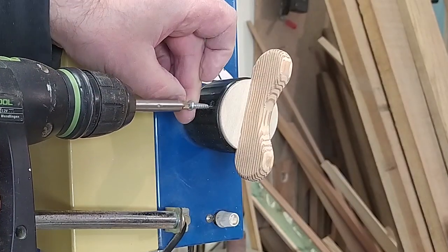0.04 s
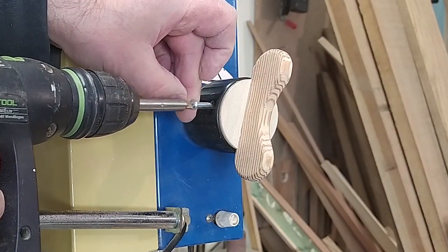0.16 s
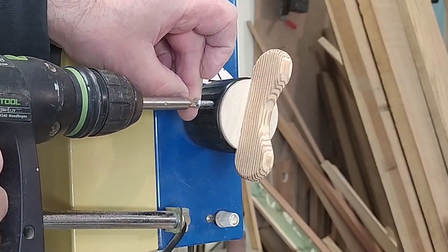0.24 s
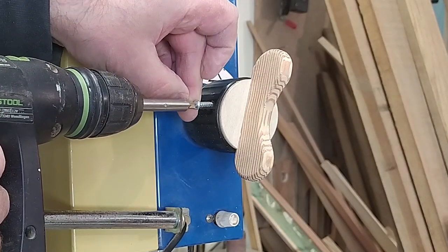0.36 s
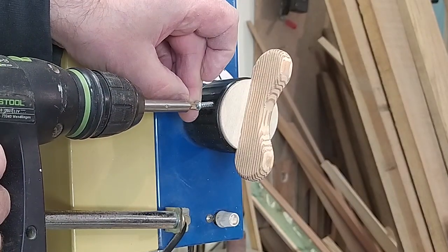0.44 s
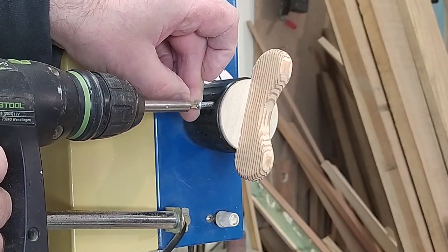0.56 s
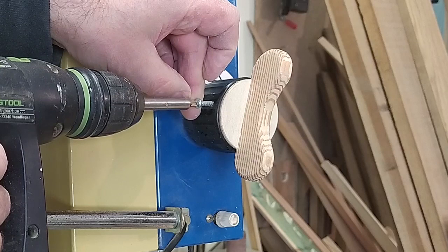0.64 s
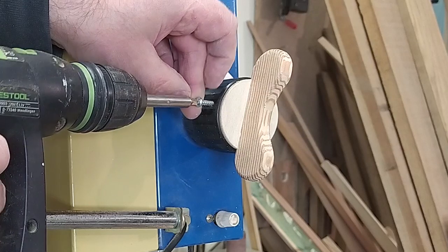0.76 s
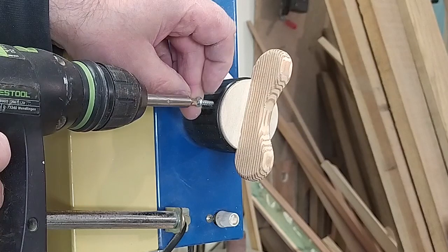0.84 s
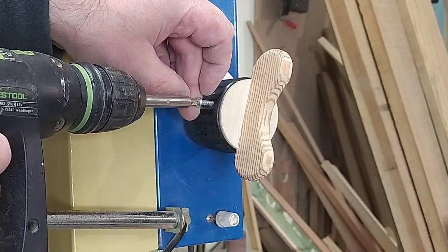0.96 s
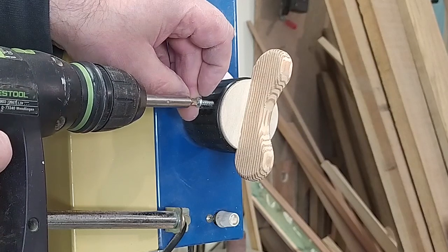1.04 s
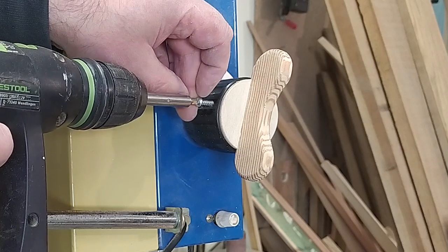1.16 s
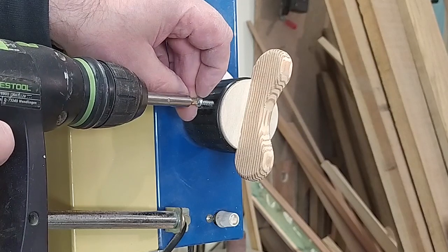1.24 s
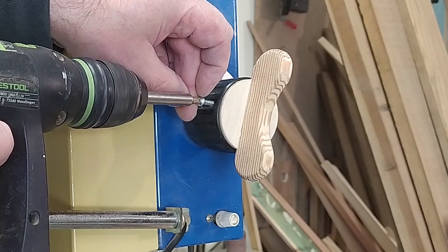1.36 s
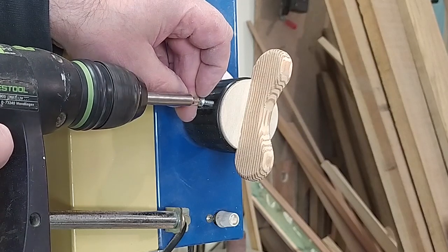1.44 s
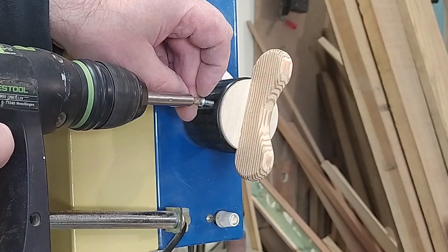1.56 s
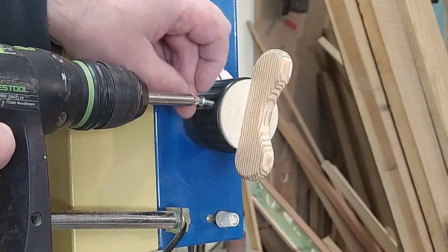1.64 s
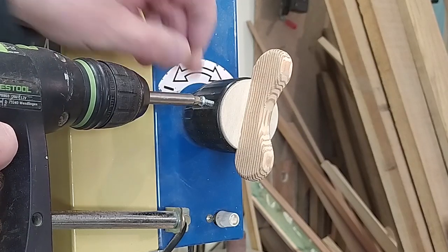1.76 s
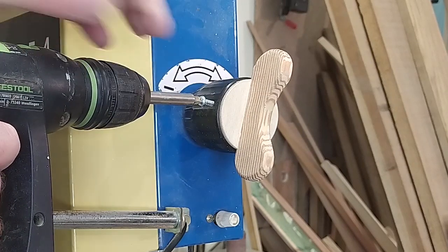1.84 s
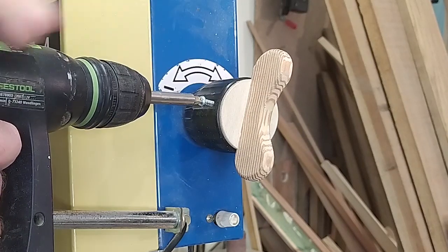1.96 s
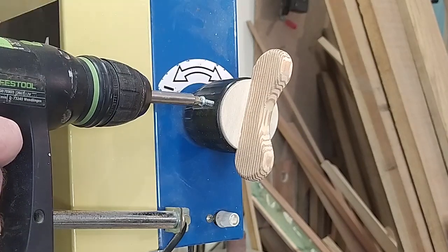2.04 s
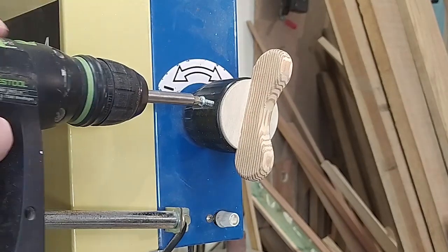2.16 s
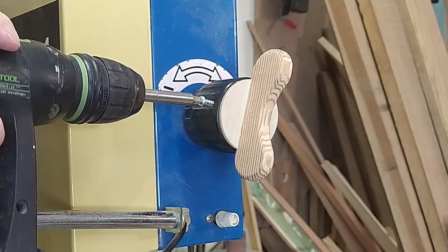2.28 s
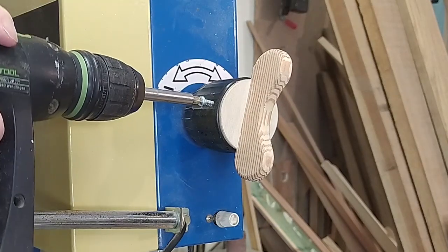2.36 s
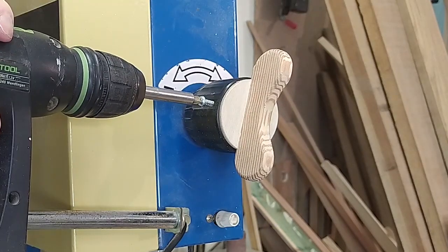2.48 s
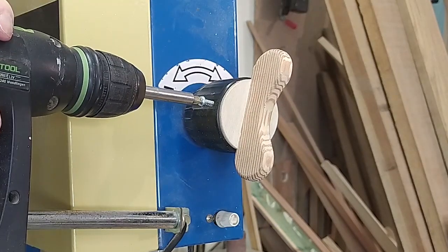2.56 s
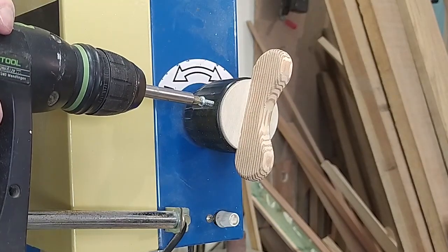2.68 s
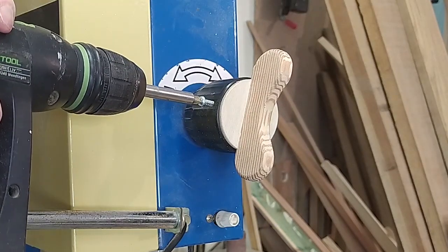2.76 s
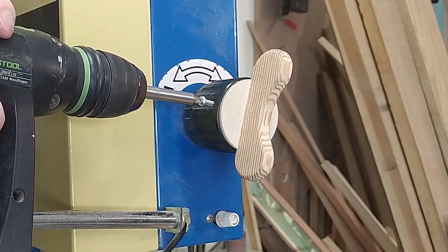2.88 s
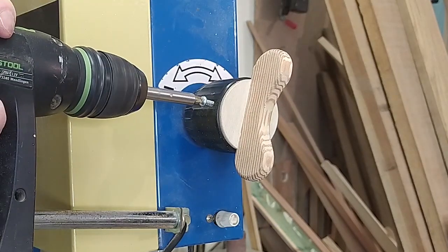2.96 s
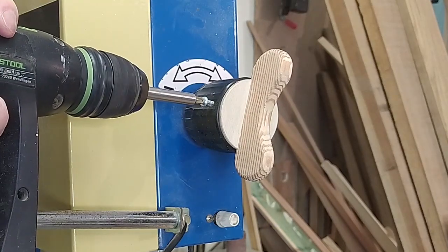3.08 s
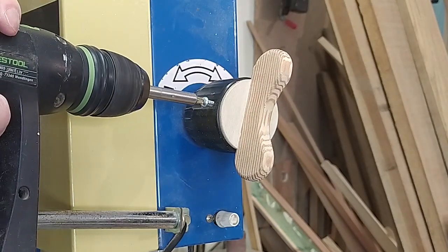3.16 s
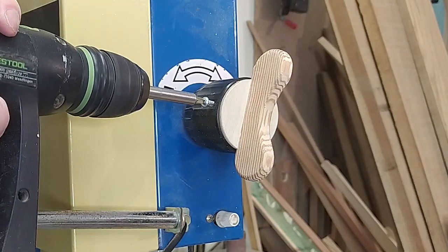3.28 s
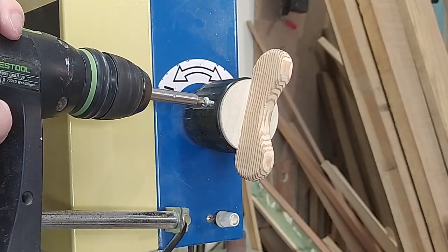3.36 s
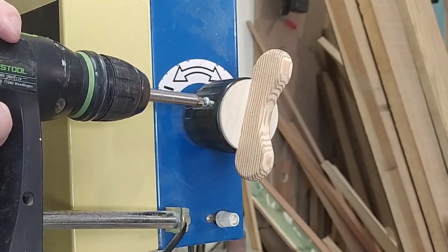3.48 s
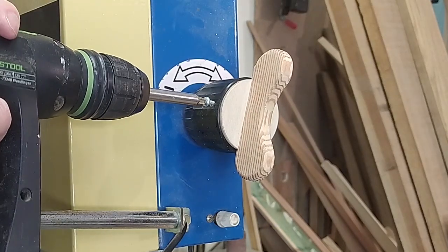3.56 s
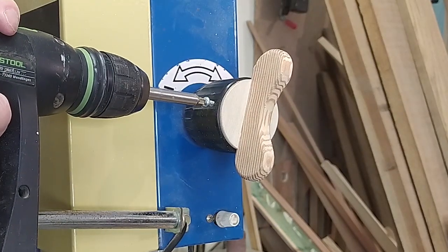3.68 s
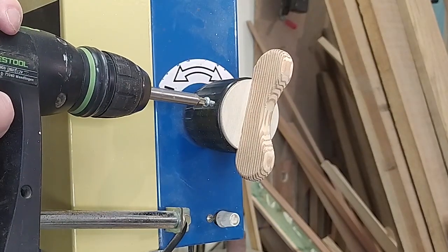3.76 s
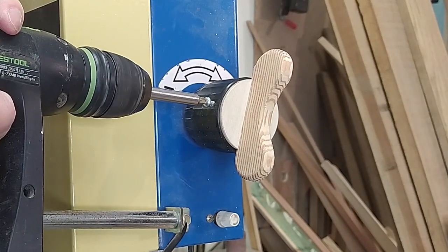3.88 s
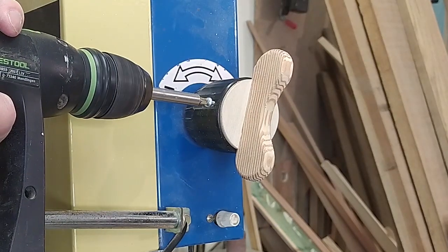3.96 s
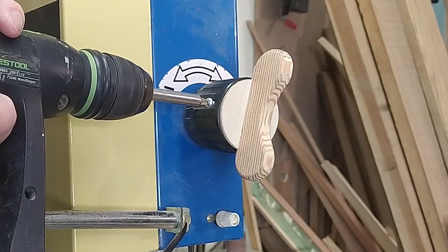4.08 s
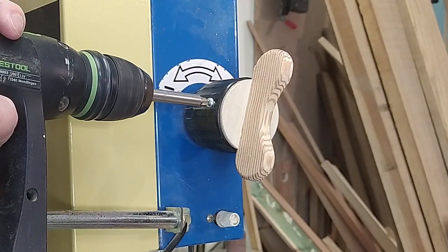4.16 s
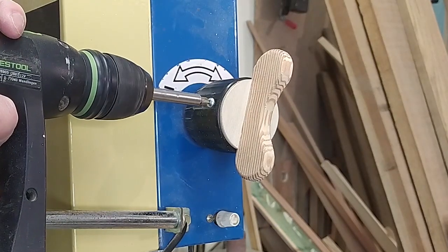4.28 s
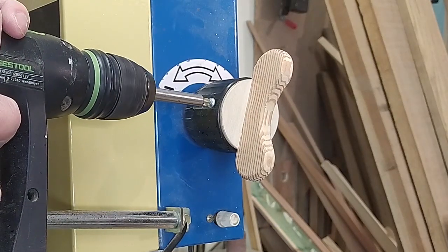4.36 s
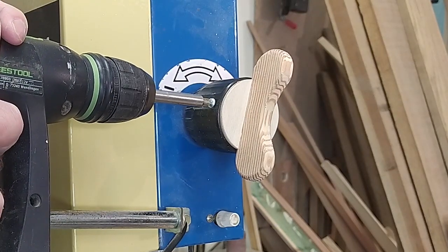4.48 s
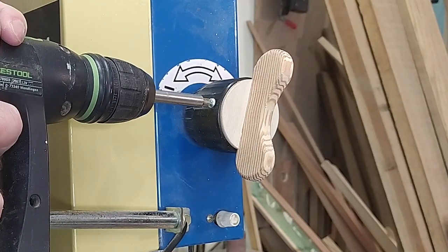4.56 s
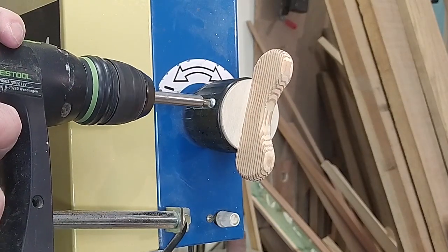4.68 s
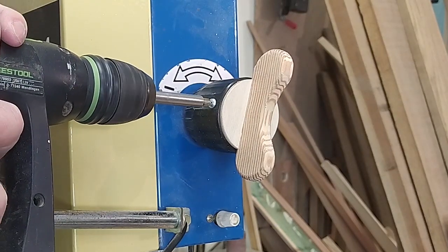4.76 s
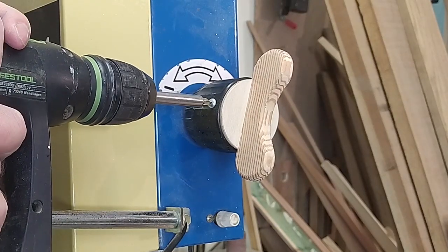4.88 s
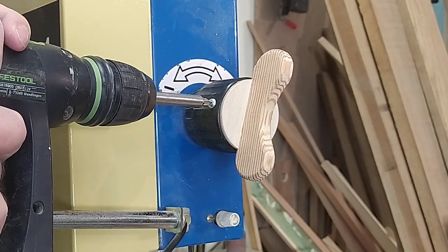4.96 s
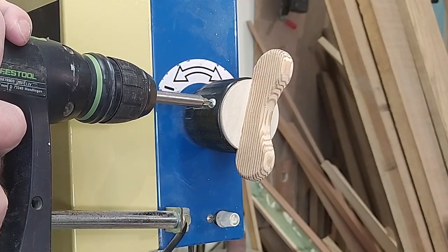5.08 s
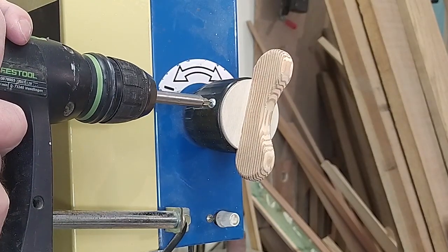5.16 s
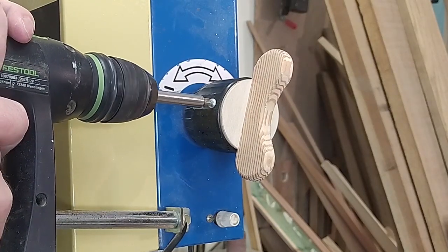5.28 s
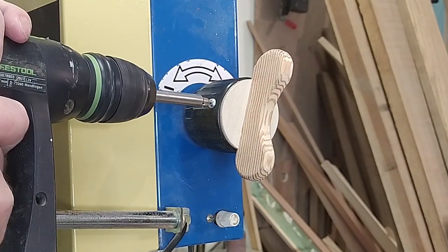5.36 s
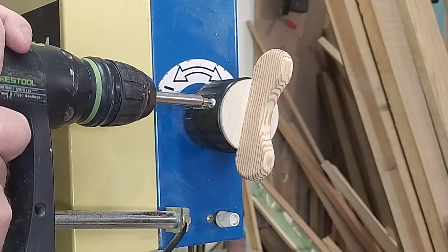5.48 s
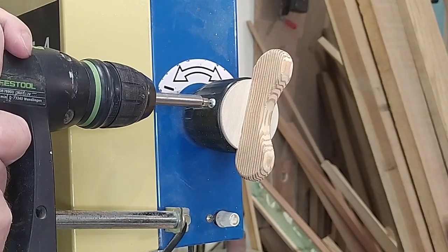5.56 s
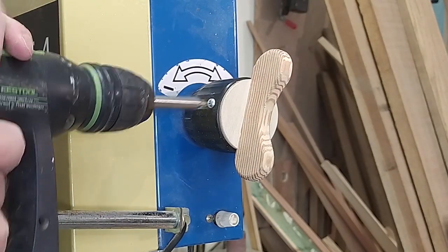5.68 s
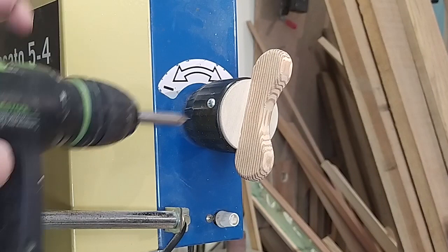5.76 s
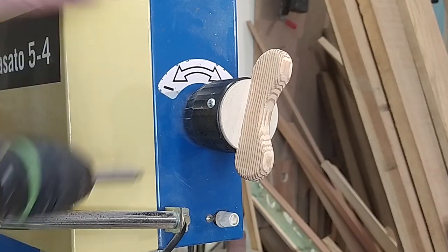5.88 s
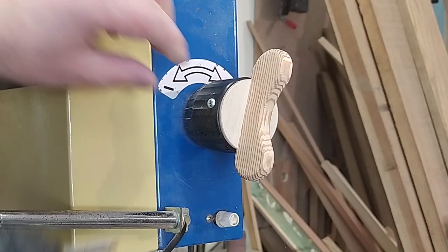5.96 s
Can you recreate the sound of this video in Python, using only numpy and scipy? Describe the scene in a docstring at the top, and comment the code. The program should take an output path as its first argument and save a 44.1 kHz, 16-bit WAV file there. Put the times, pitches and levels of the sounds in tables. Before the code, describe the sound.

Quiet workshop air and faint hiss, with barely audible bumps and a soft scrape near 0.75 s. Small ticks lead to a firmer click at 1.5 s as a cordless drill runs gently from 1.4 to 2.0 s, its whir rising briefly, then sagging with little sliding whines. Soft brushing follows around 2.2 to 2.6 s; clicks at 2.9 and 3.0. A stronger run from 3.05 to 3.65 climbs in pitch, gritty with gear rattle and a thin, very high whistle, a sharp crack and hollow bench thump at 3.55. The brightest run spans 4.0 to 4.65, whining, with heavy woody knocks near 4.6. A quick zip at 4.9 to 5.1, scattered clicks, then a last very short burst at 5.45 to 5.6 with a thump and loose chatter. The small room's tail fades; a faint hand rustle and tick come at 5.9. Close stereo pickup.

```python
"""A cordless drill drives small screws in five short runs on a hollow bench, close to a two-port phone.
Its gears rattle the housing as uneven noise; the motor switching whistles, with sidebands that follow speed.
Tones slide or hold, trigger and bit click as spikes with short rings, and strokes of noise brush and scrape.
Handling bumps, small thumps under clicks and jolts of the seating screw push and shake bench modes,
which boom and ring on; loose parts chatter. A small workshop adds decaying noise tails and quiet air."""
import sys
import numpy as np
from scipy import signal
from scipy.fft import rfft, irfft
from scipy.io import wavfile
from scipy.ndimage import uniform_filter1d

SR = 44100
rng = np.random.default_rng(int(sys.argv[2]) if len(sys.argv) > 2 else 0)


def materialize(psi):
    """Save the field psi as 16-bit PCM at rate SR to the path in sys.argv[1].

    A 1-D psi becomes a single channel; in a 2-D psi each row is a channel.
    """
    bounded = np.clip(np.atleast_2d(psi).T, -1, 1)
    quanta = np.round(bounded * 32767).astype(np.int16)
    wavfile.write(sys.argv[1], SR, quanta)


N = 265834

# quiet workshop air and hiss: f/Hz, relative level/dB
SHOP_AIR = [(12, -12), (20, 2), (59, -8.5), (83, -15.5), (166, -16.5), (232, -21), (267, -21.5),
            (298, -21.5), (885, -32), (1630, -41.5), (1880, -38), (3980, -46.5), (10600, -43.5),
            (15600, -83)]
# bumps, thumps and jolts on the bench: t/s, strength/dB, modes under 210 Hz rel level/dB,
# modes over 310 Hz rel level/dB, modes over 600 Hz rel level/dB, shaking rel level/dB, shaking decay/s
BLOWS = [(0.076, -75, -10, 14, -6, 1, 0.043), (0.282, -70, -9, 13, -29, 13, 0.29),
         (0.353, -62, 2, 17.5, -18, -9, 0.033), (0.381, -57.5, 8.5, 12, -29, -7.5, 0.12),
         (0.637, -58, -11, 4.5, -21, -0.5, 0.19), (.772, -69, 8, 10, -20, -2.5, 0.055),
         (0.914, -69, -12, -5, -16, 1.5, 0.03), (2.898, -70, 5, 4, 3, 3, 0.0089),
         (3.011, -67, 8, 1, 1, 3, 0.02), (5.333, -59, 1, 4, 2, 2, 0.01), (5.451, -66, 6, 7, -6, -2, 0.017),
         (3.542, -29, -3.5, 3, 5.5, -1.5, 0.049), (3.546, -40, 7, 5.5, 19, -17, 0.16),
         (3.612, -31.5, 2, 5, 1.5, -9, 0.016), (4.566, -26, -6.5, 7.5, 6.5, -2, 0.058),
         (4.601, -23, 0, -3.5, -9, -4, 0.02), (5.501, -56, -11, -11, -12, -11, 0.016),
         (5.51, -27, 7.5, 10, 8.5, -0.5, 0.04), (4.661, -44, -7, 18, -1.5, -0.5, 0.071),
         (4.703, -51.5, 1, 17.5, -1, -24, 0.079), (5.6, -38.5, 4, 3, 6.5, 1.5, 0.036),
         (5.551, -32, -7.5, 15.5, -12, -6, 0.11)]
# bench modes: f/Hz, level/dB, time to fall 60 dB/s
BENCH_MODES = [(197, -1, .11), (182, -15, 2.0), (270, 2, .11), (161, -27, 1.2), (303, 4, .08),
               (295, -24, 2.2), (400, -10, .08), (269, -27, 1.2), (335, -4, .09), (113, -37, 1.5),
               (212, -10, .1), (356, -20, .6), (388, -13, .22), (476, -22, .6), (416, -21, .4),
               (520, -21, .08), (262, -7, .16), (83, -25, .25), (60, -35, .3), (140, -26, .2),
               (186, -12, .4), (108, -26, .3), (571, -17, .3), (620, -16, .1), (680, -15, .15),
               (727, -10, .12), (787, -9, .1), (870, -16, .1), (970, -16, .1), (1110, -10, .12),
               (1250, -12, .08), (1460, -7, .07), (1780, -12, .05)]
# loose boards answer a blow without ringing: f/Hz, gain/dB
BOARD_CRUNCH = [(100, -9), (150, 13), (200, 9), (240, -15), (310, 29.5), (400, 35), (520, 22), (800, 38.5),
                (1500, 21), (3000, 24), (8000, -5)]
# loose parts chattering after a blow: f/Hz, gain/dB
LOOSE_PARTS = [(300, -17), (520, 30), (720, 33.5), (880, 27), (1100, 34.5), (1280, 19.5), (1460, 19.5),
               (1800, 20), (3500, 11), (8000, -28)]
# trigger and bit ticks: t/s, level/dB, low part rel level/dB, ring time to fall 60 dB/s, left minus right/dB
TICKS = [(0.1537, -72, -1, 0.04, -5), (0.187, -75, 4, 0.068, -2), (0.2856, -68, -31, 0.025, -7),
         (0.3483, -69, 10.5, 0.041, 6.5), (1.259, -61, -47, 0.025, -9.5), (1.316, -47, -5, 0.02, -3.5),
         (1.36, -63, -39, 0.015, -7), (1.3789, -55, -4, 0.014, -2), (1.408, -54, -23, 0.025, -3),
         (1.48, -33, -7.5, 0.016, -5), (2.305, -76, 10, 0.039, 1), (2.61, -69, 9.5, 0.024, -2),
         (2.8982, -35, -18, 0.0083, -5.5), (2.993, -84, 18, 0.085, 9), (3.013, -39, -10.5, 0.0086, -5),
         (3.5494, -20.5, -35, 0.011, -4), (3.8897, -61, -35, 0.037, -7), (3.9432, -35, -16, 0.0083, -5.5),
         (3.966, -60, -30, 0.058, 2), (4.558, -35, 0, 0.13, -11.5), (4.571, -32.5, 10.5, 0.015, 17),
         (4.8294, -27.5, -25, 0.0066, -3), (4.846, -40, -6, 0.0086, -2), (5.085, -40, 0.5, 0.019, 6),
         (5.2645, -40.5, -14, 0.0088, -4), (5.3313, -38.5, -18, 0.01, 4), (5.342, -52.5, -2.5, 0.026, -12),
         (5.447, -37, -14.5, 0.013, -6.5), (5.472, -51, -51, 0.046, -24), (5.5008, -30.5, -29, 0.051, 1),
         (5.514, -42, 1, 0.11, -19), (5.9185, -53, 4.5, 0.031, 1)]
# bright part of a tick: f/Hz, relative level/dB
TICK_COLOUR = [(900, -36), (1600, -26), (2500, -1.5), (4000, -10.5), (6000, -7), (7500, -1), (9000, 0.5),
               (10500, -12.5), (12500, -21), (15600, -59)]
# strokes of a sleeve or hand: loudest t/s, level/dB, swell/(dB per s), fade/(dB per s)
RUSTLES = [(2.21, -70.5, 507, 174), (2.275, -83, 631, 172), (2.428, -58, 162, 202), (2.575, -68, 193, 131),
           (5.913, -57.5, 258, 498), (6.0, -78, 199, 219)]
# brushing noise: f/Hz, relative level/dB
RUSTLE_COLOUR = [(590, -36), (1000, -32), (1600, -13), (1720, -25), (2210, -8.5), (3970, -13),
                 (5360, -14.5), (9090, -3.5), (15600, -30)]
# one scrape: loudest t/s, level/dB, swell/(dB per s), fade/(dB per s)
SCRAPE = (.75, -67, 350, 200)
# one row per pull of the trigger: pulled t/s, let go t/s, switching tone level/dB, other sidebands level/dB,
# fizz over rattle/dB, body drone start level at the reference rattle/dB, upper singing over rattle/dB,
# lower singing over rattle/dB, gear-case ring over rattle/dB
RUNS = [(1.398, 1.922, -55, -55.5, -2, -62.5, -22, -16, -27),
        (3.054, 3.648, -43, -58.5, -8, -56.5, -7.5, -52, -8),
        (4.008, 4.637, -45.5, -75, -6, -52, -24, -37, -8),
        (4.862, 5.056, -44, -74, -6.5, -49, -8.5, -19, -6),
        (5.454, 5.598, -41.5, -55, -4.5, -46.5, -20, -23, -4.5)]
# motor, one curve per run: t/s, commutation f/Hz, rattle level/dB, first upper sideband level/dB
MOTOR = [
    [(1.39, 200, -67.5, -81), (1.46, 431, -52, -70), (1.54, 479, -53, -65), (1.58, 656, -48.5, -48),
     (1.65, 669, -50, -48), (1.69, 465, -54.5, -72), (1.80, 451, -50.5, -68), (1.90, 452, -53, -71),
     (2.03, 330, -83, -85)],
    [(3.03, 156.3, -69.5, -64), (3.10, 695, -47, -67), (3.20, 786, -44.5, -73), (3.37, 880, -43, -51),
     (3.53, 907, -44.5, -53), (3.645, 880, -45, -70), (3.69, 770, -93, -80)],
    [(4.01, 149.7, -57.5, -67), (4.065, 900, -42, -55), (4.14, 1023, -41.5, -39), (4.24, 1028, -42, -39),
     (4.30, 1000, -41.5, -52), (4.40, 1001, -43.5, -51), (4.50, 1016, -41.5, -47), (4.57, 990, -43, -40),
     (4.68, 890, -49, -75)],
    [(4.87, 153, -59, -66), (4.915, 700, -46, -61), (4.96, 876, -41.5, -54), (5.03, 915, -47, -45),
     (5.08, 858, -54.5, -50), (5.12, 804, -87, -78)],
    [(5.455, 149, -51, -76), (5.515, 880, -44, -60), (5.595, 880, -44.5, -58), (5.63, 800, -50, -75)],
]
# gear rattle: f/Hz, relative level/dB
RATTLE_COLOUR = [(600, -14), (900, -19), (1300, -4.5), (1500, 3), (1850, -3.5), (2250, 5.5), (2650, -5),
                 (3400, -3.5), (4000, -3), (4700, -3.5), (5800, -8), (7500, -14), (9700, -54),
                 (16000, -110)]
# motor fizz: f/Hz, relative level/dB
FIZZ_COLOUR = [(3820, -69), (6500, -11.5), (7610, -5), (7690, -6), (9140, 1), (10700, -18), (13800, -23.5),
               (14600, -27), (15600, -89)]
# drone of the drill body: f/Hz, relative level/dB
BODY_COLOUR = [(59, -58), (100, -11.5), (166, 1), (226, -23), (260, -7.5), (344, -7.5), (698, 1),
               (1300, -4.5), (1690, 0.5), (2860, -120)]
# share of the tool's noise that differs between the ports: f/Hz, level/dB
TOOL_SPREAD = [(300, -23), (1000, -26.5), (2000, -12), (3200, -2.5), (6000, -3.5), (9000, 0)]
# other whistle sidebands: multiple of the commutation rate, relative level/dB
SIDEBANDS = [(-1, 0), (2, -1), (-2, -16), (3, -10), (4, -5)]
# gear whines and one low steady drill hum:
# start t/s, length/s, first f/Hz, final f/Hz, level/dB, pitch jitter/Hz
WHINES_AND_HUM = [(1.53, .15, 1850, 2050, -54.5, 20), (1.57, .09, 1050, 1070, -55.5, 15),
                  (1.77, .13, 2280, 2240, -53.5, 20), (1.74, .15, 1580, 1510, -55.5, 18),
                  (1.87, .10, 1400, 1030, -55.5, 30), (1.81, .11, 715, 705, -61, 12),
                  (3.20, .28, 4640, 4460, -50.5, 40), (3.07, .17, 2130, 2210, -54, 25),
                  (3.33, .16, 2300, 2240, -53, 35), (3.33, .12, 3120, 2960, -56, 25),
                  (1.49, .09, 2170, 2260, -58, 25), (3.57, .09, 2400, 2280, -51, 30),
                  (4.06, .49, 5150, 4680, -48, 20), (1.70, .46, 160, 160, -64, 4),
                  (4.94, .12, 4330, 4250, -64, 30)]
# how each source reaches the two ports: f/Hz, left minus right/dB
DRILL_PORTS = [(60, 9), (200, 5), (700, 3), (1300, 1), (2400, 1.5), (4400, -0.5), (8100, -6), (15000, -8)]
FAR_END_PORTS = [(60, -11), (15000, -3.5)]
BENCH_PORTS = [(60, 4.5), (200, 5.5), (700, 4.5), (1300, 2), (4400, 4), (8100, 11)]
WHISTLE_PORTS = [(60, -11), (15000, -11)]
# room tail: f/Hz, time to fall 60 dB/s
ROOM_T60 = [(60, 0.44), (300, 0.8), (1000, 0.54), (4000, 0.51), (10000, 0.39)]

SHOP_DB = -64.5
FRAME_DB, FRAME_LAG_S = 9.5, 0.034  # how well and how late a blow reaches the heavy frame
LONG_RING_S, LONG_SHAKE_DB = 0.2, -9
LOOSE_DB, LOOSE_S = -4.5, 0.095  # chatter level against the shaking, decay time
SPIKE_DB, RING_DB, TICK_RISE_S = 4, 3.5, 0.00051  # levels against the tick's level
GATE_S = 0.041  # each run fades in and out over this time
SWITCH_HZ, SWITCH_HISS_DB = 7967.5, -16.5  # the power stage also hisses; hiss level against the tone
SWITCH_RISE_S, SWITCH_FALL_S = 0.049, 0.0095
# the drone moves by this share of the rattle's dB and grows as the screw bites
BODY_FOLLOWS, BODY_REF_DB, BITE_DB_PER_S = 0.16, -56, 12
SINGING_SWAY_DB, GEAR_WANDER_DB = 9, 2.0
FIRST_RUN_TREBLE_DB = -0.5  # the unloaded first run is duller above 2.5 kHz
SLIDE_SETTLES, SLIDE_FADE_S = .32, .035  # settling as a share of the length; shortest fade
TOP_HZ = 15760
F = np.maximum(np.arange(N // 2 + 1) * SR / N, 1)  # every frequency, Hz
T = np.arange(N) / SR  # every moment, s


def undb(db):
    """Turn decibels into a gain."""
    return 10 ** (np.asarray(db) / 20)


def on_hz(table):
    """Read a (Hz, value) table at every frequency."""
    hz, value = np.transpose(table)
    return np.interp(np.log(F), np.log(hz), value)


def bump(centre_hz, half_width_hz, power=2):
    """One resonance: a gain that peaks at its centre."""
    return 1 / (1 + ((F - centre_hz) / half_width_hz) ** power)


def filtered(x, gain):
    """Apply a gain per frequency."""
    return irfft(rfft(x) * gain, N)


def colour(x, gain):
    """Filter by a gain per frequency, then set the rms to 1."""
    y = filtered(x, gain)
    return y / np.sqrt(np.mean(y ** 2))


def grit(spread_db):
    """Dense tiny impacts of uneven size."""
    return rng.standard_normal(N) * undb(spread_db * np.minimum(rng.exponential(size=N), 5))


def walk(rate):
    """Random levels held 1 / rate s and smoothed twice; spread 1."""
    hold = int(SR / rate)
    steps = np.repeat(rng.standard_normal(N // hold + 1), hold)
    smooth = uniform_filter1d(uniform_filter1d(steps, hold), hold)[:N]
    return smooth / smooth.std()


def tone(hz, waver_db=3):
    """A sine, rms 1 before its level is made to waver."""
    phase = 2 * np.pi * np.cumsum(hz) / SR + rng.uniform(0, 2 * np.pi)
    return np.sqrt(2) * np.sin(phase) * undb(waver_db * walk(40))


def shop():
    """Quiet workshop air and microphone hiss, with bass more alike at both ports than treble."""
    gain, apart = undb(on_hz(SHOP_AIR)), np.clip(F / 1200, .35, 1)
    mid, side = rfft(rng.standard_normal((2, N))) * gain
    left = undb(4.5) * (mid + apart * side)
    right = mid - apart * side
    pair = irfft(np.array([left, right]), N)
    return pair / np.sqrt(np.mean(pair ** 2)) * undb(SHOP_DB + .7 * walk(3))


def bench(drive):
    """Each blow is one short push and a moment of shaking; where it lands sets which modes ring most."""
    # five groups of modes: heavy frame, then up to 210, 310, 600 Hz and above
    forces = np.tile(undb(-52.0) * drive, (5, 1))
    steadier = forces.copy()
    for s, db, deep_db, mid_db, high_db, shake_db, lasts in BLOWS:
        t = np.maximum(T - s, 0)
        push = t * np.exp(-t / 0.0002)
        push = push / push.sum()
        shake = (1 - np.exp(-t / 0.00036)) * np.exp(-t / lasts) * grit(3.7)
        shake = undb(shake_db) * shake / np.sqrt(np.sum(shake ** 2))
        reach = undb(db + np.array([[deep_db], [0], [mid_db], [high_db]]))
        forces[1:] += reach * (push + shake)
        steadier[1:] += reach * (push + undb(LONG_SHAKE_DB) * shake)
        # the heavy frame is slow: it takes up push and shaking late
        late = np.roll(push + shake, int(FRAME_LAG_S * SR))
        forces[0] += undb(db + deep_db + FRAME_DB) * late
    steadier[0] = forces[0]
    crunch = np.where(F < 600, rfft(forces[2]), rfft(forces[4])) * undb(on_hz(BOARD_CRUNCH))
    boards, frame = irfft(crunch, N), np.zeros(N)
    for k, (hz, db, t60) in enumerate(BENCH_MODES):
        pole = np.exp(2j * np.pi * hz / SR - np.log(1000) / (t60 * SR))
        group = np.searchsorted([170, 210, 310, 600], hz)
        force = (steadier if t60 > LONG_RING_S else forces)[group].astype(complex)
        # modes differ in phase at the phone
        ring = (-1) ** k * undb(db) * signal.lfilter([1], [1, -pole], force).imag
        if hz < 170:
            frame = frame + ring
        else:
            boards = boards + ring
    # the boards are too small to radiate deep bass
    boards = signal.sosfilt(signal.butter(4, 160, "high", fs=SR, output="sos"), boards)
    frame = signal.sosfilt(signal.butter(4, 70, "high", fs=SR, output="sos"), frame)
    return boards + frame


def chatter():
    """Screws and offcuts on the bench rattle unevenly after each blow, as fading filtered noise."""
    shaking = np.zeros(N)
    for s, db, _, _, _, shake_db, _ in BLOWS:
        rise = np.clip((T - s) / 0.012, 0, 1)
        decay = np.exp(-np.maximum(T - s, 0) / LOOSE_S)
        shaking += undb(db + shake_db + LOOSE_DB) * rise * decay
    shaking /= np.sqrt(LOOSE_S * SR / 2)
    return filtered(shaking * grit(3.18) * undb(2.66 * walk(120)), undb(on_hz(LOOSE_PARTS)))


def ticks():
    """Sharp plastic and steel clicks: a spike and a short noisy ring, each with a bright and a low part."""
    gains, span = [undb(on_hz(TICK_COLOUR)), bump(1250, 800, 4)], SR // 4
    noise = [colour(rng.standard_normal(N), gain) for gain in gains]
    spikes = [np.roll(irfft(gain, N), 44)[:span] for gain in gains]
    out, t = np.zeros((2, N + span)), T[:span]
    for s, db, low_db, t60, pan_db in TICKS:
        at = int(s * SR) + np.arange(span)
        ring = undb(RING_DB) * (1 - np.exp(-t / TICK_RISE_S)) * np.exp(-np.log(1000) * t / t60)
        bright, low = (undb(SPIKE_DB) * spike / spike.max() + ring * hiss[at % N]
                       for spike, hiss in zip(spikes, noise))
        pan = undb(np.array([[pan_db], [-pan_db]]) / 2)
        out[:, at] += undb(db) * (bright + undb(low_db) * low) * pan
    out[0] = np.roll(out[0], 9)  # left port hears 9 samples later
    return out[:, :N]


def stroke(s, db, swell_db, fade_db):
    """Gain that swells to a peak and fades, both evenly in dB."""
    return undb(db - np.where(T < s, swell_db * (s - T), fade_db * (T - s)))


def hands():
    """Grainy noise brushes in the treble, and narrower noise makes one soft scrape."""
    grain = colour(grit(1.2), undb(on_hz(RUSTLE_COLOUR))) * undb(2.0 * walk(78))
    scrape = colour(grit(0.91), bump(1700, 400))
    return sum(stroke(*row) for row in RUSTLES) * grain + stroke(*SCRAPE) * scrape


def played(table):
    """Columns over time and a gate that is open between the first and last row."""
    s, *columns = np.transpose(table)
    gate = np.clip(np.minimum(T - s[0], s[-1] - T) / GATE_S, 0, 1)
    return gate, [np.interp(T, s, column) for column in columns]


def trigger(pulled, let_go):
    """The power stage opens gradually and shuts quickly."""
    opening = np.clip((T - pulled) / SWITCH_RISE_S, 0, 1)
    return opening * np.exp(-np.maximum(T - let_go, 0) / SWITCH_FALL_S)


def gears():
    """Gear rattle in overlapping bands that swell and sink on their own; low part and treble part."""
    spectrum = rfft(colour(grit(2.64), undb(on_hz(RATTLE_COLOUR))))
    parts = [0, 0]
    centres = 600 * 2 ** np.arange(0, 4.1, .4)
    for k, hz in enumerate(centres):
        share = np.interp(np.log(F), np.log(centres), np.arange(len(centres)) == k)
        parts[int(hz > 2500)] += irfft(spectrum * share, N) * undb(GEAR_WANDER_DB * walk(22))
    return np.array(parts) * undb(1.43 * walk(60))


def drill():
    """Gear rattle in the housing, motor fizz, body drone and three housing resonances."""
    low, treble = gears()
    rattle = low + treble * np.where(T < RUNS[1][0] - .5, undb(FIRST_RUN_TREBLE_DB), 1)
    fizz = colour(grit(2.2), undb(on_hz(FIZZ_COLOUR))) * undb(0.5 * walk(120))
    body = colour(grit(1.9), undb(on_hz(BODY_COLOUR)))
    case = colour(grit(1.2), bump(2850, 350))
    upper = colour(grit(3.5), bump(2214, 89)) * undb(SINGING_SWAY_DB * walk(20))
    lower = colour(grit(3.5), bump(1133, 100)) * undb(SINGING_SWAY_DB * walk(20))
    out = np.zeros(N)
    for run, table in zip(RUNS, MOTOR):
        pulled, let_go, switch_db, _, fizz_db, body_db, upper_db, lower_db, case_db = run
        gate, (_, rattle_db, _) = played(table)
        singing = undb(upper_db) * upper + undb(lower_db) * lower
        housing = rattle + undb(fizz_db) * fizz + singing + undb(case_db) * case
        out += gate * undb(rattle_db) * housing
        bite_db = BITE_DB_PER_S * np.clip(T - pulled, 0, let_go - pulled)
        out += gate * undb(body_db + BODY_FOLLOWS * (rattle_db - BODY_REF_DB) + bite_db) * body
        out += trigger(pulled, let_go) * undb(switch_db + SWITCH_HISS_DB) * fizz
    return out


def whistle():
    """The steady switching tone; commutation modulates it, so its sidebands follow motor speed."""
    s, hz = np.vstack(MOTOR)[:, :2].T
    turn_hz = np.interp(T, s, hz) + 5.0 * walk(60)
    steady = tone(np.full(N, SWITCH_HZ), waver_db=.8)
    first = tone(SWITCH_HZ + turn_hz)
    others = sum(undb(db) * tone(SWITCH_HZ + multiple * turn_hz) for multiple, db in SIDEBANDS)
    out = np.zeros(N)
    for (pulled, let_go, switch_db, other_db, *_), table in zip(RUNS, MOTOR):
        gate, (_, _, first_db) = played(table)
        build_up = np.clip((T - pulled) / 0.13, 0, 1) ** 2
        switching = undb(switch_db) * steady + build_up * undb(other_db) * others
        out += trigger(pulled, let_go) * switching + gate * undb(first_db) * first
    # the housing lets little out above 10 kHz
    return filtered(out, 1 / (1 + (F / 10100) ** 30))


def whines_and_hum():
    """Tones that slide towards a final pitch or hold, with some jitter."""
    out = np.zeros(N)
    for s, lasts, first_hz, last_hz, db, jitter_hz in WHINES_AND_HUM:
        done = np.clip((T - s) / lasts, 0, 1)
        hz = last_hz + (first_hz - last_hz) * np.exp(-done / SLIDE_SETTLES) + jitter_hz * walk(70)
        fade_s = max(SLIDE_FADE_S, lasts / 7)
        fade = np.minimum(np.minimum(done, 1 - done) * lasts / fade_s, 1)
        out += fade * undb(db) * tone(hz, waver_db=1.8)
    return out


def ports(x, balance, lag):
    """Two ports: the phone body shades each differently and the left one hears lag samples later."""
    half = undb(on_hz(balance) / 2)
    spectrum = rfft(x * np.minimum((T[-1] - T) / .004, 1))  # short fade at the very end
    delay = np.exp(-2j * np.pi * F * lag / SR)
    return np.array([irfft(spectrum * half * delay, N), irfft(spectrum / half, N)])


def room(x, wet_db):
    """Diffuse noise tail that dies octave by octave; both ports share its bass."""
    t, tail = T[:SR], np.zeros((2, SR))
    room_hz, room_t60 = np.transpose(ROOM_T60)
    early = 1 + 2.0 * np.exp(-t / 0.0073)  # bench top and nearby boards answer first
    for hz in 60 * 2. ** np.arange(8):
        t60 = np.interp(np.log(hz), np.log(room_hz), room_t60)
        mid, side = rng.standard_normal((2, SR))
        apart = min(hz / 2130.0, 1)
        band = signal.butter(2, [hz / np.sqrt(2), hz * np.sqrt(2)], "band", fs=SR, output="sos")
        pair = signal.sosfilt(band, [mid + apart * side, mid - apart * side]) / np.sqrt(1 + apart ** 2)
        tail += pair * early * np.exp(-np.log(1000) * t / t60) * np.clip(t / 0.00041, 0, 1)
    return signal.fftconvolve(x, tail * undb(wet_db), axes=1)[:, :N]


def scene():
    """Everything near the phone, its room tails and the background."""
    tool = drill()
    near = ports(tool, DRILL_PORTS, 11.6) + ports(hands(), DRILL_PORTS, 9.25)
    # the tool is long: its far end, with noise of its own, reaches the ports from another side
    far_end = filtered(drill(), undb(on_hz(TOOL_SPREAD)))
    near = near + ports(far_end, FAR_END_PORTS, 6.2)
    boom = ports(bench(tool) + chatter(), BENCH_PORTS, 9.2)
    clicks = ticks()
    tones = ports(whistle(), WHISTLE_PORTS, 7.65) + ports(whines_and_hum(), DRILL_PORTS, 8)
    direct = near + boom + clicks + tones
    tails = room(near, -35.5) + room(boom, -40.0) + room(clicks, -40.5) + room(tones, -48)
    return direct + tails + shop()


def record(dry):
    """The phone cuts the top with a steep low-pass filter."""
    return signal.sosfilt(signal.ellip(8, .2, 70, TOP_HZ, fs=SR, output="sos"), dry)


dry = scene()
out = record(dry)
materialize(out)
```